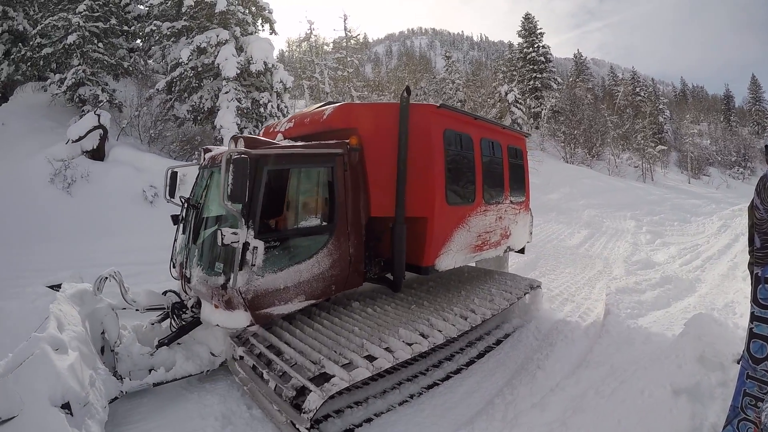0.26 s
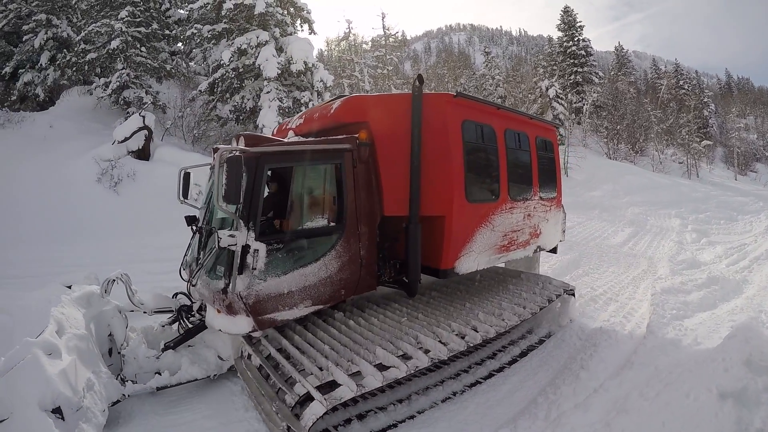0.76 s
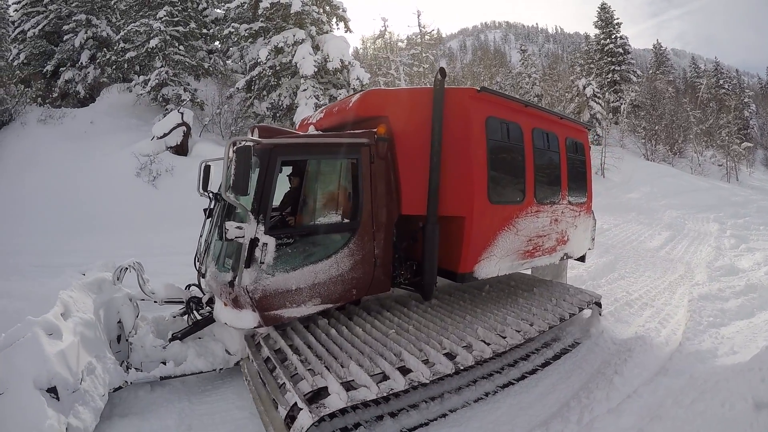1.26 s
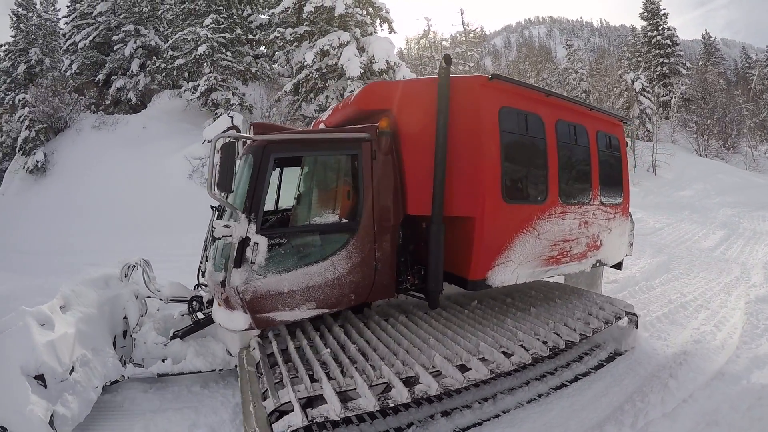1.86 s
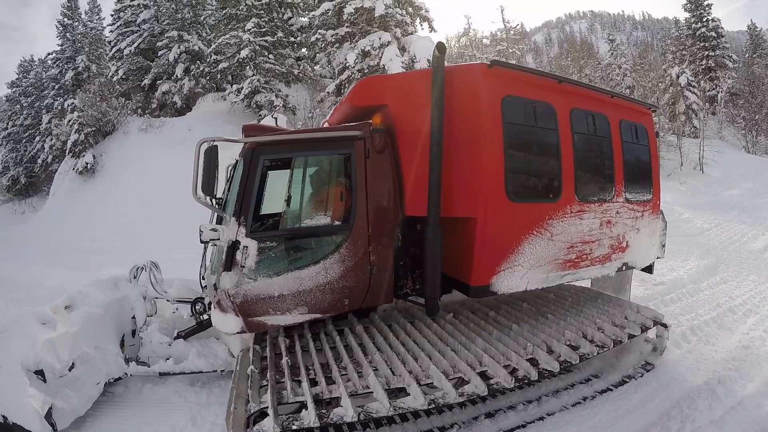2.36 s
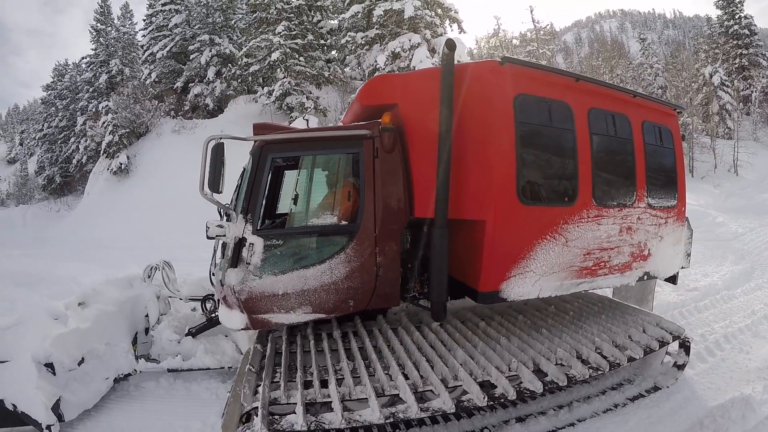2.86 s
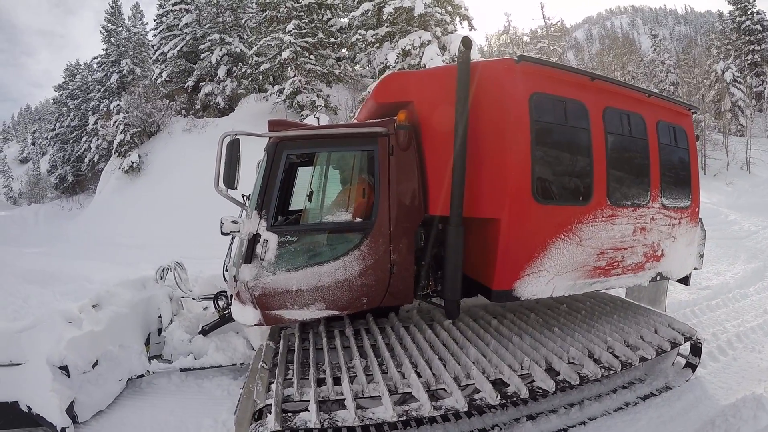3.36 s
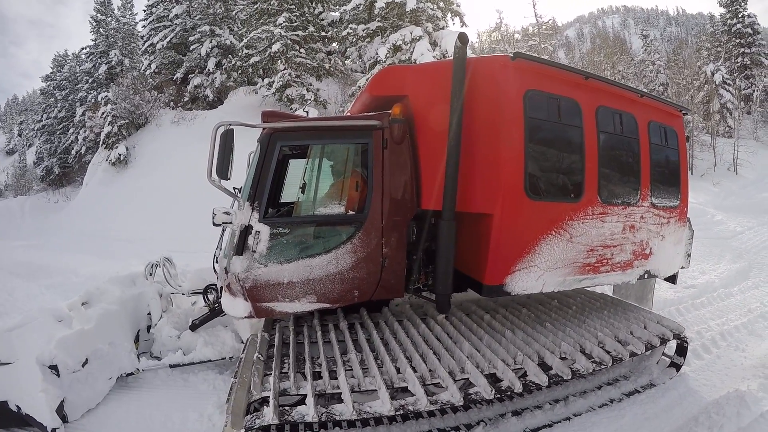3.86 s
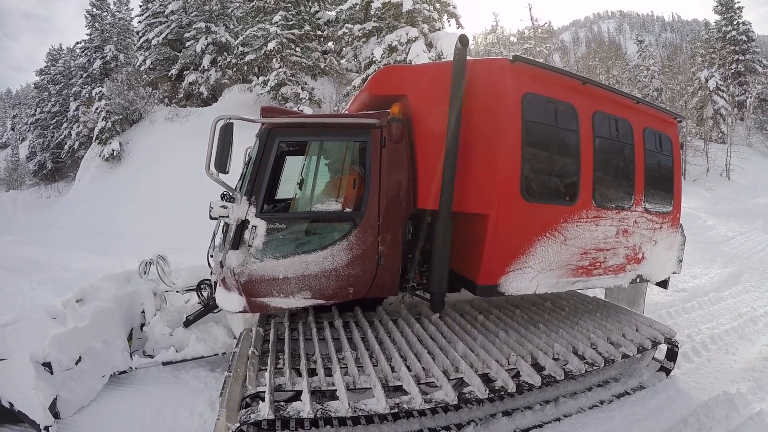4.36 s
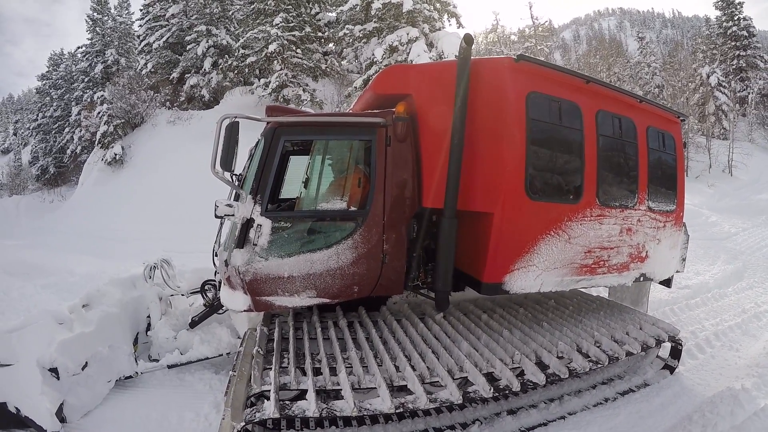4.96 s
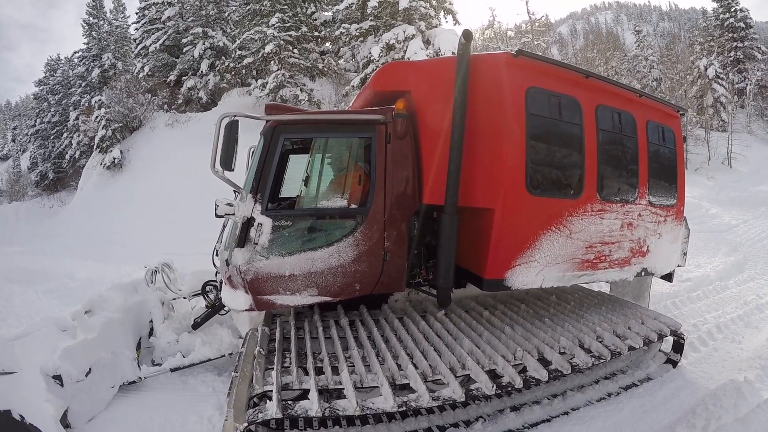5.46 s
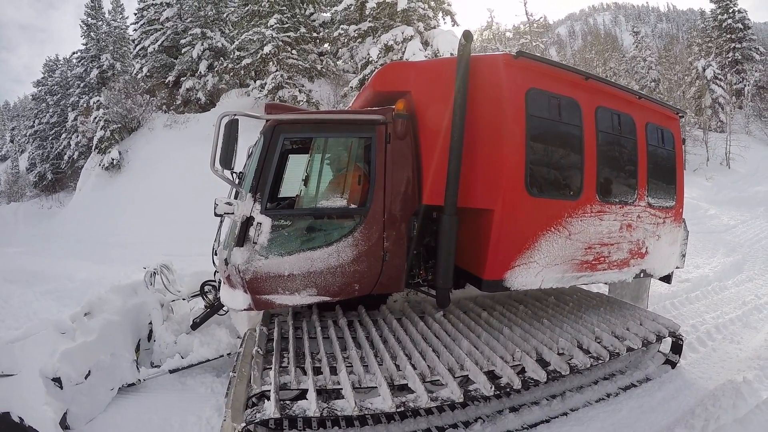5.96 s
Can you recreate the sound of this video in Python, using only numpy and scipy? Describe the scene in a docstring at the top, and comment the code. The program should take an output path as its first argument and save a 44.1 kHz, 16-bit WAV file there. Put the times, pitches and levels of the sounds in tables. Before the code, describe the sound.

A tracked snow vehicle's diesel engine runs close by outdoors at raised revs, with a low hum, rushing fan, thin turbo whistle and a rasping, squeaky belt. About halfway through, the pitch drops, the whistle fades and the engine settles into a clattering idle with light panel rattles. Wind rumbles on the moving microphone, and loud, dull handling thumps and knocks come at scattered moments.

```python
"""Snowcat dropping to idle

A six-cylinder turbo diesel stands in snow at raised revs, then sinks to idle. The exhaust hums,
injectors clatter, the fan rushes, a dry belt pulley rasps, the turbo whistles, a hydraulic pump whines.
The camera is carried past: its housing is bumped now and then, and air rumbles on the microphone."""
import sys
import numpy as np
from scipy import signal
from scipy.fft import rfft, irfft, next_fast_len
from scipy.io import wavfile
from scipy.ndimage import uniform_filter1d

SR = 44100
rng = np.random.default_rng(int(sys.argv[2]) if len(sys.argv) > 2 else 0)


def digitize_waveform(pressure):
    """Quantize a signal to 16-bit integers and store it at the path in sys.argv[1].

    Rows of a 2-D input are taken as channels; values are limited to [-1, 1].
    """
    field = np.atleast_2d(pressure).T
    bounded = np.clip(field, -1, 1)
    quanta = np.round(bounded * 32767).astype(np.int16)
    wavfile.write(sys.argv[1], SR, quanta)


N = 273861

# Governor hunting, then the drop to idle. Each row: time in seconds, firing rate in Hz.
FIRING_RATE = [(0, 65), (.33, 65.8), (1.0, 63.9), (1.35, 65.2), (1.7, 65.3), (2.2, 66.7), (2.45, 65.6),
               (2.7, 60.6), (2.8, 59.2), (2.92, 51.9), (3.08, 45.4), (3.35, 40), (3.7, 37.7), (6.21, 37.45)]
# Engine tones. Each row: multiple of the firing rate, base level in dB at full throttle, same at idle.
EXHAUST_ORDERS = [(1, -28.5, -31.5), (2, -28, -41), (3, -41, -48.5), (4, -48.5, -49), (5, -61.5, -80),
                  (6, -63, -69)]
GEAR_ORDERS = [(3.37, -50.5, -62), (7.18, -60.5, -86), (14.95, -57.5, -79), (19.9, -57, -105),
               (21.84, -69, -71), (28.57, -54, -74), (30.1, -54.5, -76), (32.8, -76, -77),
               (49.74, -63, -59), (53.5, -80, -58), (58.2, -72, -59)]
# Hydraulic pump under load. Each row: start in seconds, length in seconds, level in dB.
PUMP_BOUTS = [(1.45, .6, -51.5), (3.13, .66, -47.5)]
# Relative knock of each cylinder in dB, in firing order.
CYLINDER_DB = [1.4, -0.76, -0.21, 0.68, 1.2, -0.62]
# Roar swells as the camera passes the bay. Each row: centre in seconds, half width in seconds, strength.
ROAR_SWELLS = [(.17, 0.18, 0.34), (1.79, 0.5, 0.84), (2.63, 0.17, 0.32)]
# Each: base level at idle in dB, dB added by full throttle, dB added by a swell of strength 1.
BLOCK_DB = (-49, 3.4, 11.1)
BAY_DB = (-42, 2.55, 5.9)
HISS_DB = (-57.5, 1.8, 7.6)
TURBO_DB = (-63.5, 2.8, 9.6)
# Dry pulley chatter. Each row: start in seconds, length in seconds, pitch in Hz, level in dB.
BELT_BOUTS = [(0, 0.34, 4920, -51.5), (1.08, 0.94, 4900, -48), (2.05, .72, 4550, -52.5),
              (2.103, 0.62, 4140, -55), (2.967, 1.46, 4160, -54), (4.365, 2.5, 4384, -52),
              (5.16, .45, 4460, -51)]
# Short squeaks and buzzes. Each row: centre in seconds, pitch in Hz, level in dB, half width in seconds.
BELT_SQUEAKS = [(1.123, 4770, -40, 0.026), (1.31, 4800, -41, .016), (2.217, 4500, -42, .016),
                (2.501, 4650, -42, 0.016), (2.7, 4520, -41, 0.015)]
FITTING_BUZZES = [(4.515, 1800, -39.5, 0.021), (4.61, 1776, -43, 0.032), (5.215, 1660, -42, 0.009)]
# Intake resonance. Each row: time in seconds, centre in Hz, level in dB.
INTAKE_PATH = [(0, 1693, -42.5), (.9, 1880, -44), (2.5, 2027, -45), (3.1, 2140, -70)]
# Turbo swinging with the governor, then running down. Each row: time in seconds, pitch in Hz.
TURBO_PITCH = [(0, 6690), (.33, 6730), (.78, 6220), (1.08, 5890), (1.4, 5875), (1.68, 6155), (2.04, 6510),
               (2.45, 5920), (2.8, 5650), (3.2, 4950), (3.9, 4150), (6.21, 2500)]
# Air duct resonances. Each row: centre in Hz, half width in Hz, boost in dB.
DUCT_MODES = [(6166, 52, 13), (6390, 38, 8.5)]
# Hard knocks on the camera. Each row: time in seconds, thud peak in dB, ring in Hz,
# contact in seconds, tick gain in dB.
HOUSING_KNOCKS = [(0.2958, -6.5, 103, 0.00072, -15), (2.138, -5.5, 95, 0.00065, -3),
                  (2.1585, -6.5, 104, 0.00075, -0.5), (3.009, -15, 84, 0.00034, 2.5),
                  (3.6702, -11, 80, 0.00077, -0.5), (3.9168, -4, 104, 0.00061, 1.5),
                  (5.0324, -1, 125, 0.0007, 2), (5.0508, -5, 120, .00048, 1)]
# Soft pushes on the camera. Each row: time in seconds, peak in dB, contact in seconds.
HAND_SHOVES = [(0.315, -6, 0.0071), (.415, -8.5, 0.0047), (.98, -13.5, 0.0032), (2.313, -6.5, 0.0052),
               (3.263, -11, 0.0036), (3.677, -5.5, 0.0045), (5.058, -2, 0.0031), (5.505, -7.5, 0.0038),
               (6.179, -7.5, .0018)]
# Crusted snow breaking. Each row: time in seconds, gain in dB.
SNOW_CLICKS = [(0.7994, -42), (2.8285, -40), (4.5126, -39), (5.1994, -43)]
# Loose panels. Each row: ring in Hz, gain in dB, decay in seconds, crank turns per blow,
# time of one blow in seconds.
PANEL_MODES = [(1444, -37.5, 0.02, 2, 5.286), (1380, -38, 0.012, 2, 5.365), (973, -45.5, 0.032, 1, 5.575),
               (4130, -36.5, 0.0067, 2, 4.8), (2114, -32, 0.0076, 2, 5.625)]
# How directly the panels face the camera. Each row: time in seconds, gain in dB.
PANEL_FACING = [(4, -5.5), (4.6, -2.5)]
# Spectra. Each row: frequency in Hz, relative density in dB.
BLOCK_SPECTRUM = [(50, -28), (100, 9), (160, 10.5), (220, 3), (320, 2.5), (450, -3), (650, -5),
                  (900, -12.5), (1300, -7.5)]
FAN_SPECTRUM = [(500, -15.5), (800, -3), (1000, 0), (1220, -13), (1400, 2.5), (1850, 1), (2300, -2),
                (2750, -3), (3150, -3.5), (3700, -13.5), (4300, -6.5), (4950, -7.5), (5400, -13.5),
                (6100, -8.5), (7200, -43)]
CLATTER_SPECTRUM = [(500, -16), (800, -5.5), (980, -5.5), (1220, -14), (1380, -2.5), (2100, 2.5),
                    (2500, -3), (3150, -2.5), (3600, -14.5), (4300, -7.5), (4900, -10), (5350, -15.5),
                    (6100, -14), (7100, -60)]
HISS_SPECTRUM = [(4000, -18), (6000, 3), (7000, -1.5), (7700, 1), (8800, -5), (11000, -6), (12500, -8.5),
                 (15000, -9)]
WIND_SPECTRUM = [(4, -22), (10, 6), (16, -5), (25, 4), (38, -4.5), (50, -8), (65, -18), (90, -16),
                 (120, -31), (170, -31.5), (300, -66), (700, -90)]
TICK_SPECTRUM = [(200, -27), (550, -3.5), (1000, -0.5), (1600, -8.5), (2300, -3), (3000, -28), (3850, -7.5),
                 (4700, -26), (6200, -28), (10000, -52)]
SNOW_SPECTRUM = [(2500, -20), (4000, 4), (6000, 7), (9000, 0), (12000, -1), (15000, -5)]
COMBUSTION_SPECTRUM = [(1300, 1), (1500, -12), (2100, -3.5), (2750, 0), (3200, -7.5), (3700, -28),
                       (5000, -23), (6000, -12.5), (7000, -23)]

IDLE_HZ, FULL_HZ, FIRINGS_PER_TURN = 37.7, 66, 3
TIME_S = np.arange(N) / SR


def amp(db):
    """Decibels to gain."""
    return 10 ** (np.asarray(db) / 20)


def unit(x):
    """Scale to rms 1."""
    return x / np.sqrt(np.mean(x ** 2) + 1e-20)


def curves(rows):
    """One value per sample for each column after the time."""
    times_s, *columns = np.transpose(rows)
    return [np.interp(TIME_S, times_s, column) for column in columns]


def bell(x, centre, width):
    """Smooth hump of height 1."""
    return np.exp(-((x - centre) / width) ** 2)


def held(start_s, length_s, ramp_s):
    """Trapezoid envelope, ramps centred on its ends."""
    return np.clip(np.minimum(TIME_S - start_s, start_s + length_s - TIME_S) / ramp_s + .5, 0, 1)


def wobble(rate_hz):
    """Smooth random curve, rate_hz knots a second."""
    knots = rng.standard_normal(int(N * rate_hz / SR) + 4)
    fine = signal.resample(knots, 8 * len(knots))
    return np.interp(TIME_S * rate_hz, np.arange(len(fine)) / 8, fine)


def noise():
    """White noise of rms 1."""
    return rng.standard_normal(N)


def filtered(x, response):
    """x through a frequency response."""
    size = next_fast_len(N + SR // 2)
    return irfft(rfft(x, size) * response(np.fft.rfftfreq(size, 1 / SR)), size)[:N]


def shaped(x, spectrum):
    """x through (Hz, dB) points on a log axis."""
    points_hz, db = np.transpose(spectrum)
    return filtered(x, lambda hz: amp(np.interp(np.log(hz + 1), np.log(points_hz), db, -120, -120)))


def coloured(x, spectrum):
    """Shaped x at rms 1."""
    return unit(shaped(x, spectrum))


def tone(cycles, waver_db, rate_hz):
    """Sine with a level wavering about rms 1."""
    return np.sqrt(2) * np.sin(2 * np.pi * cycles) * amp(waver_db * wobble(rate_hz))


def rasp(cycles, width_hz):
    """Narrow noise around a tone."""
    phase = 2 * np.pi * cycles
    return unit(wobble(width_hz) * np.sin(phase) + wobble(width_hz) * np.cos(phase))


def chirps(table, width_hz):
    """Short swells of narrow noise."""
    return sum(amp(db) * bell(TIME_S, centre_s, half_s) * rasp(hz * TIME_S, width_hz)
               for centre_s, hz, db, half_s in table)


def orders(table, firings, throttle, waver_db, drift):
    """Crank-locked tones, each between its idle and full-throttle level."""
    return sum(amp(idle_db + throttle * (full_db - idle_db))
               * tone(order * (firings + drift * wobble(9)) + rng.random(), waver_db, rate_hz=8.8)
               for order, full_db, idle_db in table)


def roar_gain(levels_db, throttle):
    """Idle level raised by throttle and swells."""
    idle_db, throttle_db, swell_db = levels_db
    swell = sum(strength * bell(TIME_S, centre_s, half_s) for centre_s, half_s, strength in ROAR_SWELLS)
    return amp(idle_db + throttle_db * throttle + swell_db * swell)


def blows(cycles, scatter_db):
    """One pulse of random size per whole cycle."""
    pulses = np.diff(np.floor(cycles), prepend=np.floor(cycles[0]))
    return pulses * amp(scatter_db * rng.uniform(-1.2, 1, N))


def strokes(firings, decay_firings, scatter_db):
    """Envelope: a burst per firing, a weak valve click halfway to the next."""
    stroke = firings.astype(int)
    size = amp(scatter_db * rng.standard_normal((stroke[-1] + 1, 2)))[stroke]
    cylinder_gain = amp(CYLINDER_DB)[stroke % len(CYLINDER_DB)]
    burst = cylinder_gain * size[:, 0] * np.exp(-(firings % 1) / decay_firings)
    valve = size[:, 1] * np.exp(-((firings + .5) % 1) / decay_firings)
    return unit(burst + 0.043 * valve)


def exhaust(firings, throttle, pass_s=2.305, half_width_s=0.25, boost_db=4):
    """The stack hums on firing harmonics, louder as the camera passes it."""
    gain_db = 0.06 + boost_db * bell(TIME_S, pass_s, half_width_s)
    return amp(gain_db) * orders(EXHAUST_ORDERS, firings, throttle, waver_db=0.95, drift=0.0018)


def hydraulic_pump(firings, order=6.6, free_db=-61):
    """The crank-driven pump whines, louder under load."""
    load = sum(amp(db) * held(start_s, length_s, ramp_s=0.19) for start_s, length_s, db in PUMP_BOUTS)
    return (amp(free_db) + load) * tone(order * firings, waver_db=2.5, rate_hz=6.23)


def gears(firings, throttle, timing_order=35.7, overrun_db=-44.5):
    """Gear meshes follow the crank; the timing gears sing as the engine slows."""
    backlash = .05 * wobble(110)
    overrun = amp(overrun_db) * held(start_s=2.58, length_s=.4, ramp_s=0.17)
    timing = overrun * tone(timing_order * firings + backlash, waver_db=4, rate_hz=40)
    return timing + orders(GEAR_ORDERS, firings, throttle, waver_db=2.0, drift=0.0059)


def block(firings, throttle):
    """Unequal cylinders make the block drone on crank harmonics, clearer under throttle."""
    turns = firings / FIRINGS_PER_TURN
    lines = sum(tone(k * turns + rng.random(), waver_db=2.5, rate_hz=3.82) for k in range(10, 48))
    drone = (.3 + .5 * throttle) * coloured(lines, BLOCK_SPECTRUM)
    rumble = 0.97 * coloured(noise(), BLOCK_SPECTRUM)
    return roar_gain(BLOCK_DB, throttle) * (drone + rumble)


def cylinder_knocks(firings, rise_s=.003, decay_s=.014):
    """Each cylinder rings the engine its own way, alike on every firing."""
    t, out = np.arange(SR // 12) / SR, np.zeros(N)
    envelope = (1 - np.exp(-t / rise_s)) * np.exp(-t / decay_s)
    for k, db in enumerate(CYLINDER_DB):
        pulses = blows((firings - k) / len(CYLINDER_DB), scatter_db=2)
        ring = rng.standard_normal(len(t)) * envelope
        out += amp(db) * signal.fftconvolve(pulses, ring)[:N]
    return out


def fan(firings, beat):
    """Rushing air, plus a comb of crank harmonics from fan and gears."""
    rush = coloured(noise() * (1 + 0.29 * beat), FAN_SPECTRUM)
    turns = firings / FIRINGS_PER_TURN + .002 * wobble(9)
    comb = sum(rng.lognormal(0, 1.0) * np.sin(2 * np.pi * (k * turns + rng.random()))
               for k in range(42, 140))
    return unit(rush + .5 * coloured(comb, FAN_SPECTRUM))


def engine_bay(firings, throttle):
    """Fan rush under throttle, diesel clatter at idle, a pulsing hiss over both."""
    beat = strokes(firings, decay_firings=0.49, scatter_db=5.0)
    pulsing = unit(noise() * (1 + .5 * beat))
    clatter = coloured(pulsing + 0.56 * unit(cylinder_knocks(firings)), CLATTER_SPECTRUM)
    roar = np.sqrt(1 - throttle) * clatter + np.sqrt(throttle) * fan(firings, beat)
    hiss = coloured(noise() * (1 + 0.22 * beat), HISS_SPECTRUM)
    roar *= roar_gain(BAY_DB, throttle) * amp(0.58 * wobble(14))
    hiss *= roar_gain(HISS_DB, throttle) * amp(0.29 * wobble(10))
    return roar + hiss


def belt(firings):
    """A dry pulley rasps in fluttering bouts, jerked by each firing, and sometimes squeaks."""
    stray_cycles = np.cumsum(70 * wobble(30)) / SR
    bouts = sum(amp(db) * held(start_s, length_s, ramp_s=.06)
                * rasp(hz * TIME_S + stray_cycles, width_hz=380)
                for start_s, length_s, hz, db in BELT_BOUTS)
    flutter = amp(4.6 * np.tanh(1.2 * wobble(22)))
    jerks = strokes(firings, decay_firings=1.0, scatter_db=2.8)
    return bouts * unit(flutter * jerks) + chirps(BELT_SQUEAKS, width_hz=400)


def intake():
    """Drawn air rushes in one hollow resonance."""
    hz, db = curves(INTAKE_PATH)
    return amp(db) * rasp(np.cumsum(hz) / SR, width_hz=380)


def turbo(throttle, inertia_s=.2, end_s=3.8):
    """A thin whistle glides, flares in the duct's resonances and dies away."""
    hz = uniform_filter1d(curves(TURBO_PITCH)[0], round(inertia_s * SR), mode="nearest")
    duct_db = sum(db * bell(hz, centre_hz, half_hz) for centre_hz, half_hz, db in DUCT_MODES)
    spinning = held(start_s=-1, length_s=end_s + 1, ramp_s=.3)
    whistle = tone(np.cumsum(hz + 7 * wobble(60)) / SR, waver_db=2.0, rate_hz=51)
    return spinning * roar_gain(TURBO_DB, throttle) * amp(duct_db) * whistle


def wind(start_db=-19, fall_db_per_s=0.5):
    """Air rumbles on the microphone, less as the camera slows."""
    rumble = unit(coloured(noise(), WIND_SPECTRUM) * amp(1.22 * wobble(6.6)))
    return amp(start_db - fall_db_per_s * TIME_S) * rumble


def thud(t, ring_hz, contact_s):
    """A push swings the housing once or twice; peak 1."""
    swing = np.cos(2 * np.pi * ring_hz * t) * np.exp(-2.3 * ring_hz * t)
    push = (t / contact_s) ** 4 * np.exp(-3.6 * t / contact_s)
    motion = signal.fftconvolve(swing, push)[:len(t)]
    return motion / np.abs(motion).max()


def housing_bumps(shove_hz=61, scrape_s=0.0015):
    """A soft shove swings the whole camera; a hard knock thuds and ticks."""
    thuds, ticks, t = np.zeros(N + SR), np.zeros(N + SR), np.arange(SR // 5) / SR
    for start_s, db, contact_s in HAND_SHOVES:
        thuds[round(start_s * SR):][:len(t)] += amp(db) * thud(t, shove_hz, contact_s)
    for start_s, db, ring_hz, contact_s, tick_db in HOUSING_KNOCKS:
        thuds[round(start_s * SR):][:len(t)] += amp(db) * thud(t, ring_hz, contact_s)
        snap = (t == 0) + 0.28 * rng.standard_normal(len(t)) * np.exp(-t / scrape_s)
        ticks[round(start_s * SR):][:len(t)] -= amp(tick_db) * snap
    return thuds[:N] + shaped(ticks[:N], TICK_SPECTRUM)


def snow_crackle(decay_s=.0005):
    """Crumbs of snow break with tiny dry clicks."""
    out, t = np.zeros(N), np.arange(SR // 100) / SR
    for start_s, db in SNOW_CLICKS:
        out[round(start_s * SR):][:len(t)] += amp(db) * rng.standard_normal(len(t)) * np.exp(-t / decay_s)
    return shaped(out, SNOW_SPECTRUM)


def hard_combustion(firings, level_db=-44):
    """While the engine pulls, combustion adds a bright rasp, pulsing with the firings."""
    bursts = noise() * (7 + .6 * strokes(firings, decay_firings=.35, scatter_db=2))
    pulling = held(start_s=0.91, length_s=1.89, ramp_s=0.042)
    return amp(level_db) * pulling * coloured(bursts, COMBUSTION_SPECTRUM)


def panels(firings, throttle, rise_s=0.0033):
    """At idle, loose panels ring every one or two crank turns."""
    t, out = np.arange(SR // 8) / SR, np.zeros(N)
    turns = firings / FIRINGS_PER_TURN
    for hz, db, decay_s, turns_per_blow, blow_s in PANEL_MODES:
        ring = np.sin(2 * np.pi * hz * t) * np.exp(-t / decay_s) * (1 - np.exp(-t / rise_s))
        cycles = (turns - turns[round(blow_s * SR)]) / turns_per_blow
        out += amp(db) * signal.fftconvolve(blows(cycles, scatter_db=3.0), ring)[:N]
    return (1 - throttle) * out * amp(curves(PANEL_FACING)[0])


def idle_whine(throttle, pitch_hz=12300, idle_db=-77):
    """A thin high whine comes and goes at idle."""
    return (1 - throttle) * amp(idle_db + 3.6 * wobble(5.2)) * rasp(pitch_hz * TIME_S, width_hz=600)


def loose_fitting():
    """A loose fitting buzzes briefly."""
    return chirps(FITTING_BUZZES, width_hz=600)


def scene():
    """One crankshaft drives the engine's parts; throttle is derived from its speed. Mono."""
    firing_hz, = curves(FIRING_RATE)
    firings = np.cumsum(firing_hz) / SR
    throttle = np.clip((firing_hz - IDLE_HZ) / (FULL_HZ - IDLE_HZ), 0, 1) ** 1.54
    mix = exhaust(firings, throttle) + hydraulic_pump(firings) + gears(firings, throttle)
    mix += block(firings, throttle) + engine_bay(firings, throttle)
    mix += panels(firings, throttle) + belt(firings) + loose_fitting()
    mix += hard_combustion(firings) + intake() + turbo(throttle) + idle_whine(throttle)
    mix += housing_bumps() + snow_crackle() + wind()
    return mix[None]


def record(dry, top_hz=15350):
    """The camera rounds peaks near full scale and cuts everything above top_hz."""
    rounded = dry[0] / (1 + dry[0] ** 8) ** (1 / 8)
    return filtered(rounded, lambda hz: hz < top_hz)[None]


dry = scene()
out = record(dry)
digitize_waveform(out)
```